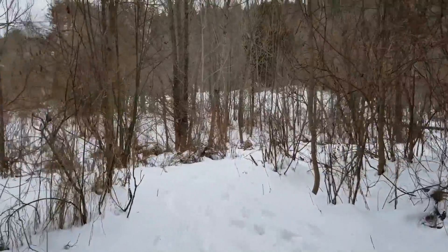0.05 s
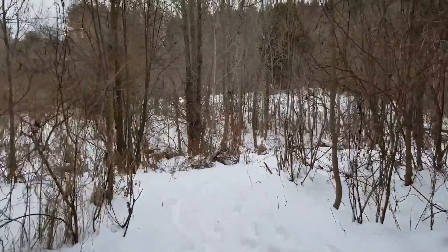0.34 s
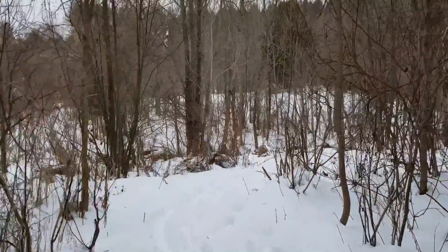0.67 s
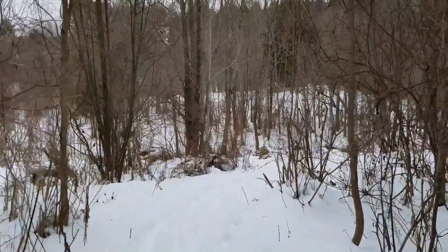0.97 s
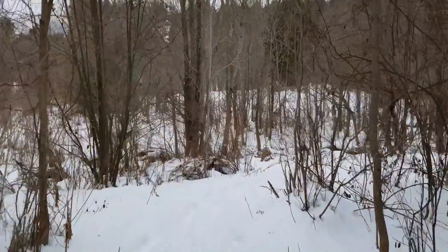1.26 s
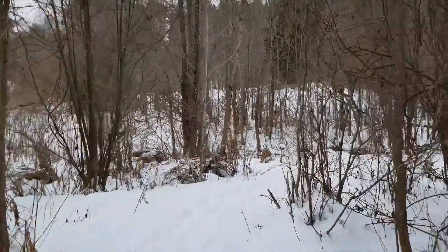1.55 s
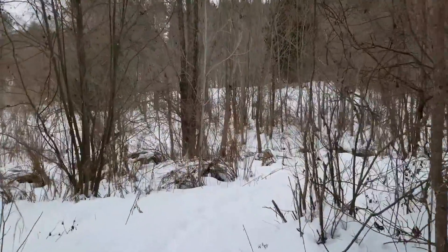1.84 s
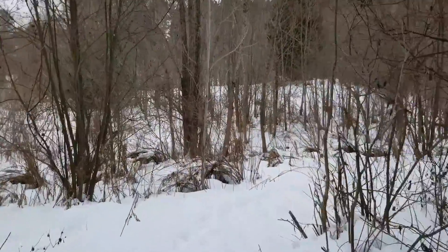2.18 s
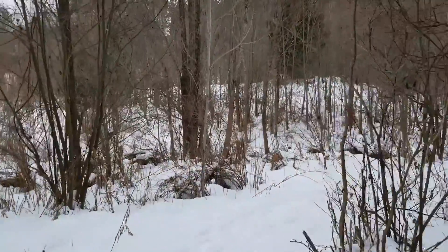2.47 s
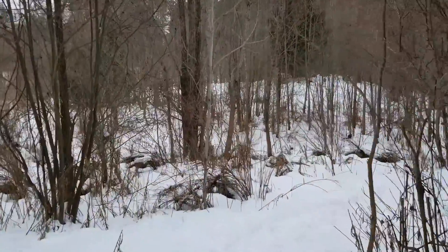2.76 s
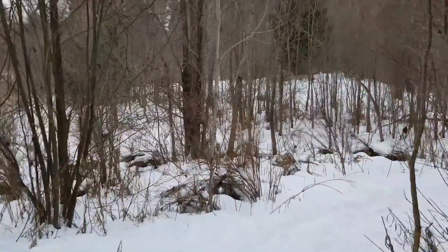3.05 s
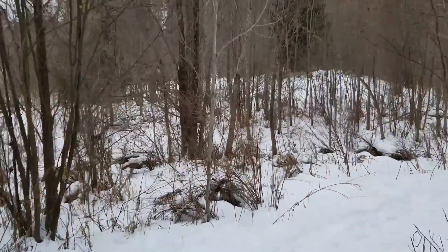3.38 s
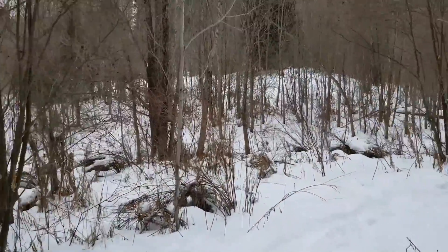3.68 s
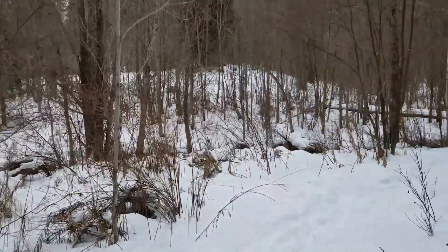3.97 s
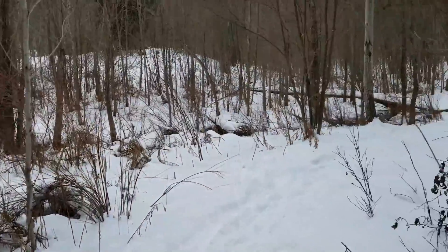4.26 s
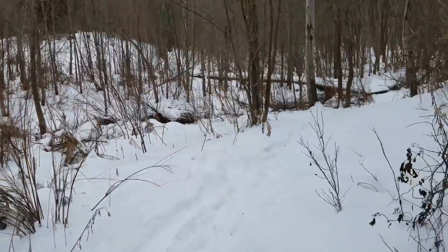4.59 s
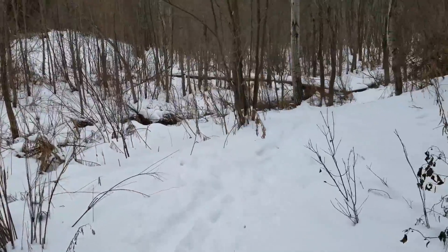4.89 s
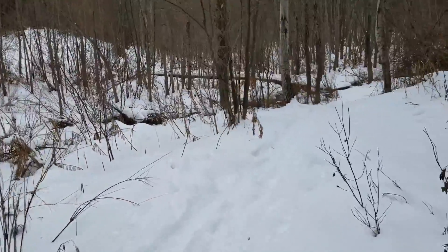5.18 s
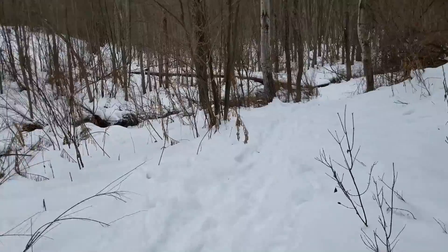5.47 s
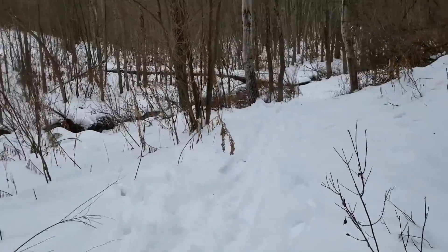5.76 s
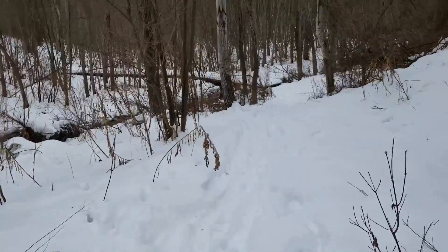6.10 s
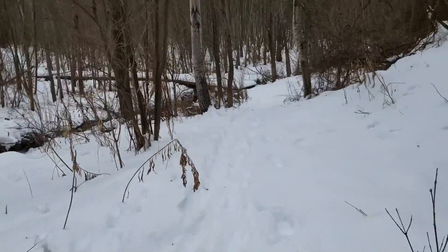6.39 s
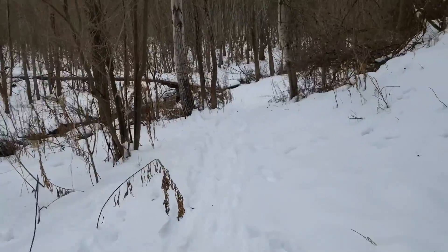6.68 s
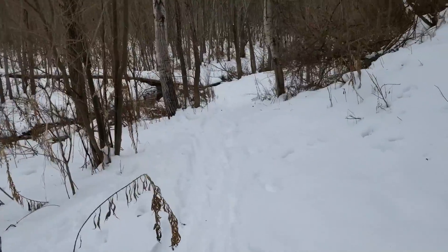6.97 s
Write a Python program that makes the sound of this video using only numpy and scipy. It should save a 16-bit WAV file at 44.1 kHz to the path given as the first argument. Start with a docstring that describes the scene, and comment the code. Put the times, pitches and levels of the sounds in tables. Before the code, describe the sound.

Steady footsteps crunch through old, crusty snow, about two a second, close and dry over a faint hiss.

```python
"""Footsteps in old snow in a quiet wood, two a second, dry and close over a faint, even hiss.
Each boot first scuffs the surface, then the heel bites. As the weight comes on, ice bonds snap by the
thousand, crystals fizz and the pack groans; bits of crust give way in hollow crunches and the sole drops
with dull thuds. The boot lifts and loose snow trickles back. From about 2 s on a few small things snap,
and around 4 s come the hardest crunch and thud."""
import sys
import numpy as np
from scipy import signal
from scipy.fft import rfft, irfft, next_fast_len
from scipy.io import wavfile
from scipy.ndimage import uniform_filter1d, map_coordinates

SR = 44100
rng = np.random.default_rng(int(sys.argv[2]) if len(sys.argv) > 2 else 0)


def bounce(signal):
    """Save signal as a 16-bit WAV file at the path given by the first command-line argument."""
    frames = np.transpose(np.atleast_2d(signal))
    limited = np.clip(frames, -1, 1)
    pcm = np.round(limited * 32767).astype(np.int16)
    wavfile.write(sys.argv[1], SR, pcm)


N = 310464


def snow():
    """The main layer: low groan, mid crunch and top fizz, ridden by the boots and surging together."""
    pack_db, crunch_db, fizz_db = tread()
    breaks, shake_power, fizz_power = crust_breaks(crust_grains(), creak_q=2.2, creak_share=0.33)
    surge = avalanches(per_s=72, fade_s=0.0073)
    crust = unit(crust_grains() * amp(0.9 * surge + 0.87 * wobble(per_s=140)))
    low = amp(1.06) * pack_groan(surge) * np.sqrt(amp(pack_db) ** 2 + amp(-8) ** 2 * shake_power)
    mid = amp(-0.5) * (crust * amp(crunch_db) + breaks)
    top = amp(1.5) * crystal_fizz(surge) * np.sqrt(amp(fizz_db) ** 2 + fizz_power)
    return low + mid + top + amp(-13) * crackle() * amp(crunch_db)


# Footsteps: landing t/s, press to full weight t/s, roll to lift-off t/s, full-weight crunch level/dB,
# swell from landing/dB, sag to lift-off/dB, pack over crunch/dB, fizz over crunch/dB,
# scuff level/dB, scuff length/s, trickle level/dB
STEPS = [(0.172, 0.043, .17, -30, -1, 15.5, -11, -2.5, -45.5, .109, -51),
         (0.554, 0.15, 0.096, -29.5, 17, 4, -12, 0.5, -47, 0.043, -39.5),
         (1.069, 0.092, 0.12, -29.5, 9.5, 7, -12, -3, -61, .048, -47.5),
         (1.563, .19, 0.092, -30, 10, 6.5, -11, -4.5, -44.5, .12, -43.5),
         (2.035, .15, 0.035, -28, 10, 1, -8.5, -3.5, -46.5, 0.099, -42.5),
         (2.531, 0.024, .14, -27.5, 11, 3.5, -12, -5.5, -42, 0.16, -37.5),
         (2.977, .21, 0.045, -26.5, 15, 7, -15, -3, -48.5, 0.047, -48),
         (3.452, 0.16, 0.029, -31, 9.5, -5, -15, -2.5, -72, .042, -33),
         (4.007, .14, 0.15, -26, 14, 17.5, -17, -3, -73, 0.023, -48.5),
         (4.489, .24, 0.059, -22.5, 15, 3, -18, -5.5, -71, .048, -43),
         (5.014, 0.16, .071, -22, 16, 15, -17.5, -3.5, -46.5, 0.079, -52.5),
         (5.476, 0.057, .17, -26.5, 3, 12.5, -17.5, -4, -44, .038, -50.5),
         (5.953, .13, 0.04, -26, 11, 5.5, -11, -2.5, -43, 0.092, -45),
         (6.408, 0.14, 0.062, -26, 9, 9.5, -11.5, -5.5, -41.5, 0.054, -47),
         (6.874, 0.069, 0.097, -29.5, 18, 0, -11.5, -1, -58.5, .039, -43)]
def tread():
    """Each boot grazes, lands, takes the weight and lifts: envelopes in dB for pack, crunch and fizz."""
    attack_s, release_s = 0.0025, 0.0022
    heel_db, heel_s = 1, 0.015
    scuff_rise_db_per_s, trickle_fall_db_per_s = 12, 95
    t = np.arange(N) / SR
    power = np.zeros((3, N))
    loose = amp(-52.5 + 2 * wobble(per_s=77)) ** 2  # crumbs keep stirring between the steps
    for land, press, roll, db, swell_db, sag_db, pack_db, fizz_db, scuff_db, scuff_s, trickle_db in STEPS:
        near = abs(t - land) < 1
        age, lift = t[near] - land, press + roll
        weight_db = np.interp(age, [0, press, lift], [-swell_db, 0, -sag_db])
        weight_db += heel_db * np.exp(-abs(age) / heel_s)  # the heel bites through the surface
        landed, lifted = gate(age, attack_s), gate(age - lift, release_s)
        # pack and fizz swell less than the crunch does
        layers_db = np.array([pack_db + 0.67 * weight_db, weight_db, fizz_db + 0.65 * weight_db])
        power[:, near] += (amp(db + layers_db) * landed * (1 - lifted)) ** 2
        grazing = gate(age + scuff_s, attack_s) * (1 - landed)
        scuff = amp(scuff_db - scuff_rise_db_per_s * abs(age)) * grazing
        trickle = amp(trickle_db - trickle_fall_db_per_s * abs(age - lift)) * lifted
        loose[near] += scuff ** 2 + trickle ** 2
    loose_balance = amp([[-10.5], [0], [-0.5]])  # loose snow has little low end
    return 10 * np.log10(power + loose * loose_balance ** 2)


# Tone of the breaking crust: f/Hz, level/dB
CRUST_EQ = [(100, -57.5), (280, -2.5), (480, -0.5), (900, 1), (1900, -0.5), (2800, -3), (4500, -8.5),
            (6500, -9.5), (12000, -35)]
def crust_grains():
    """The body of the crunch: dense, soft fractures of middling size."""
    fractures = grains(count=30000, low_hz=317, high_hz=5510, cycles=0.89, spread_db=0.5, samples=160)
    return squeaky(coloured(fractures, CRUST_EQ), patchy_db=2.5)


def crackle():
    """The edge on the crunch: single bonds snap clear of the rest."""
    bonds = grains(count=2500, low_hz=910, high_hz=4970, cycles=0.67, spread_db=14.5, samples=120)
    return unit(coloured(bonds, CRUST_EQ))


# Bits of crust giving way: centre t/s, length/s, crunch level/dB, fizz level/dB, creak f/Hz
CRUST_BREAKS = [(0.113, 0.021, -30.5, -38.5, 960), (0.365, 0.019, -33, -40, 1520),
                (0.431, 0.011, -35.5, -37.5, 1700), (0.487, .018, -40.5, -49, 990),
                (0.719, 0.025, -24.5, -36, 870), (0.752, .016, -20.5, -39, 2110),
                (0.871, .011, -37, -36, 800), (0.969, 0.035, -40.5, -47, 820),
                (1.171, 0.019, -25, -47, 1790), (1.573, 0.023, -39, -34, 910),
                (1.633, 0.017, -28.5, -34.5, 840), (1.726, 0.033, -22, -31, 700),
                (1.802, 0.017, -29, -42, 1100), (2.036, 0.012, -24, -41, 1120),
                (2.184, 0.013, -30, -35, 1400), (2.262, 0.011, -33.5, -34, 690),
                (2.483, 0.014, -37, -41, 1180), (2.666, 0.015, -20.5, -34, 680),
                (2.888, 0.023, -42, -42.5, 700), (2.92, 0.014, -35.5, -39, 1000),
                (3.276, .012, -32.5, -41, 1090), (3.459, 0.013, -38.5, -39, 885),
                (3.584, .015, -28, -30.5, 1000), (3.658, .016, -15, -27, 2110),
                (3.888, 0.028, -35, -40, 1790), (3.96, 0.0078, -38.5, -44, 924),
                (4.022, 0.026, -46, -32, 1200), (4.09, 0.03, -26.5, -40, 770),
                (4.153, .018, -20.5, -31, 700), (4.393, 0.031, -41.5, -46, 1080),
                (4.502, 0.014, -25.5, -35, 740), (4.722, 0.015, -28, -28, 1280),
                (4.917, 0.018, -28, -41, 1170), (4.984, 0.0092, -38.5, -36.5, 1107),
                (5.025, 0.015, -32.5, -36, 1740), (5.155, 0.01, -25, -24.5, 700),
                (5.379, 0.02, -38, -45, 930), (5.86, 0.023, -44.5, -57, 1000), (5.91, 0.016, -33, -54, 890),
                (5.956, 0.014, -28, -38, 1030), (6.084, 0.022, -29, -48, 645),
                (6.285, .025, -46, -50, 1200), (6.367, 0.013, -40, -53, 1100),
                (6.414, .013, -31, -46, 1100), (6.638, 0.015, -42, -44, 1790),
                (6.673, 0.012, -38.5, -38, 695), (6.714, 0.016, -42, -46, 1680),
                (6.766, .014, -34, -39, 910), (6.836, 0.0089, -40.5, -51, 700),
                (6.889, 0.037, -45, -33.5, 1200), (6.934, 0.014, -27.5, -28, 1080)]
def crust_breaks(crust, creak_q, creak_share):
    """Slabs break fast and settle: returns the crunches and the power they send to pack and fizz."""
    t = np.arange(N) / SR
    crunches, shake_power, fizz_power = np.zeros((3, N))
    for centre, length, crunch_db, fizz_db, hz in CRUST_BREAKS:
        near = slice(max(0, int((centre - .1) * SR)), int((centre + .1) * SR))
        offset = (t[near] - centre) / length
        attack = 1 / (1 + np.exp(np.clip(-14 * (offset + .5), -50, 50)))
        swell = attack * np.exp(-1.5 * offset ** 2)
        # the slab rings briefly at a pitch set by its size
        creak = unit(signal.lfilter(*signal.iirpeak(hz, creak_q, SR), crust[near]))
        envelope = amp(crunch_db) * swell
        crunches[near] += envelope * unit(creak_share * creak + (1 - creak_share) * crust[near])
        shake_power[near] += (envelope * 700 / hz) ** 2  # big, low slabs shake the pack most
        fizz_power[near] += (amp(fizz_db) * swell) ** 2
    return crunches, shake_power, fizz_power


# Tone of the snow pack: f/Hz, level/dB
PACK_EQ = [(30, -60), (60, -34), (100, -14), (160, -1.5), (260, 2), (400, 0.5), (550, 0), (1000, -50),
           (3000, -61)]
def pack_groan(surge):
    """The weight under the step: coarse, low fractures as the snow packs down."""
    fractures = grains(count=3200, low_hz=105.5, high_hz=700, cycles=1.0, spread_db=15.5, samples=900)
    return unit(coloured(fractures * amp(0.95 * surge), PACK_EQ))


# Tone of the snow's top fizz, with the microphone's peaks near 9.3 and 15 kHz: f/Hz, level/dB
FIZZ_EQ = [(1500, -53.5), (3500, -9.5), (5500, -10), (8300, -2.5), (9150, .5), (9700, 0), (10700, -9.5),
           (12200, -8), (14000, -2.5), (15800, -1)]
def crystal_fizz(surge):
    """The sparkle on top: the finest fractures, with extra avalanches of their own."""
    fractures = grains(count=60000, low_hz=3040, high_hz=17700, cycles=0.53, spread_db=0, samples=24)
    flicker_db = 1.4 * surge + 1.3 * avalanches(per_s=150, fade_s=0.011)
    return squeaky(coloured(fractures * amp(flicker_db), FIZZ_EQ), patchy_db=1.9)


# Sudden drops of the sole: t/s, relative level/dB, nominal f/Hz
SOLE_DROPS = [(0.2007, -25, 312), (0.37, -30, 290), (0.7095, -21, 685), (0.7359, -15.5, 440),
              (0.771, -25, 350), (1.5068, -34.5, 340), (1.6284, -32, 513), (1.6948, -28, 556),
              (1.729, -18.5, 453), (1.936, -30, 284.6), (2.0162, -28.5, 360), (2.0547, -24.5, 308),
              (2.259, -25, 425), (2.488, -30.5, 276), (2.5559, -27, 647), (2.6779, -18.5, 493),
              (2.742, -22, 360), (2.8834, -31, 520), (3.7118, -19, 410), (3.7199, -16.5, 550),
              (4.0464, -22.5, 275), (4.1334, -13.5, 418), (4.6, -24, 500), (5.158, -15, 523),
              (6.0755, -19.5, 560), (6.9291, -23, 606)]
def sole_thuds():
    """The sole drops and stops: a heavily damped swing that dives in pitch, with a puff of grit."""
    out, t = np.zeros(N + SR), np.arange(SR // 20) / SR
    for start, db, hz in SOLE_DROPS:
        turns = hz * (0.733 * t + 0.000519 * (1 - np.exp(-t / 0.0009)))
        swing = np.sin(2 * np.pi * turns) * np.exp(-turns / 0.78)
        grit = 0.33 * rng.standard_normal(len(t)) * np.exp(-t / 0.0052)
        out[round(start * SR):][:len(t)] += amp(db + 5.5) * (swing + grit)
    thud_eq = [(30, -20), (60, -37), (130, -5.5), (250, 1.5), (1800, 7.5), (5000, -11), (15000, -17)]
    return coloured(out[:N], thud_eq)


# Small dry snaps of ice or twigs: t/s, relative level/dB
SNAPS = [(1.858, -29), (2.828, -25), (2.8396, -28), (3.2362, -23), (3.34, -27), (3.3577, -30),
         (6.1919, -27), (6.641, -34)]
def snaps():
    """Ice or a twig breaks: a tick of a millisecond or two with a thin, bright ring."""
    out, t = np.zeros(N + SR), np.arange(SR // 50) / SR
    for start, db in SNAPS:
        ring_hz = 2900 * np.exp(0.082 * rng.standard_normal())
        ring = 0.75 * np.sin(2 * np.pi * ring_hz * t)
        crack = 0.37 * rng.standard_normal(len(t))
        out[round(start * SR):][:len(t)] += amp(db + 3.5) * (ring + crack) * np.exp(-t / 0.00051)
    return out[:N]


# Tone of the background hiss, with the microphone's peaks near 9.3 and 15 kHz: f/Hz, level/dB
HISS_EQ = [(25, -36), (60, -19), (150, -1), (450, -2), (1500, -4), (5500, -12), (9300, -1), (11000, -12),
           (15800, -8)]
def hiss():
    """The bed: a faint, even background hiss."""
    return amp(-57) * unit(coloured(rng.standard_normal(N), HISS_EQ))


def grains(count, low_hz, high_hz, cycles, spread_db, samples):
    """A cloud of tiny fractures, rms 1: each rings for a cycle or so at its own pitch and strength."""
    when, pitch, strength, sign = rng.random((count, 4)).T
    hz = low_hz + (high_hz - low_hz) * pitch
    turns = hz[:, None] * np.arange(samples) / SR
    gain = np.sign(sign - .5) * np.sqrt(hz) * amp(spread_db * strength ** 2)  # many faint, few strong
    rings = gain[:, None] * np.sin(2 * np.pi * turns) * np.exp(-turns / cycles)
    where = (when * N).astype(int)[:, None] + np.arange(samples)
    return unit(np.bincount(where.ravel(), rings.ravel(), N)[:N])


def avalanches(per_s, fade_s):
    """A modulator, mean 0 and rms 1: one failure sets off many at once, then they die away."""
    triggers = (rng.random(N) < per_s / SR).astype(float)
    activity = signal.lfilter([1], [1, -np.exp(-1 / (fade_s * SR))], triggers)
    return unit(activity - activity.mean())


def squeaky(x, patchy_db):
    """Neighbouring grains lock for a few hundredths of a second, so brief pitches poke out; rms 1."""
    spectrum = signal.stft(x, nperseg=512)[2]
    patches = uniform_filter1d(rng.standard_normal(spectrum.shape), size=4, axis=0)  # across pitch
    patches = uniform_filter1d(patches, size=4, axis=1)  # across time
    return unit(signal.istft(spectrum * amp(patchy_db * unit(patches)), nperseg=512)[1][:N])


def coloured(x, eq):
    """Minimum-phase EQ through (f/Hz, level/dB) points, so attacks have no pre-ring."""
    size = 2 * next_fast_len(N // 2 + 4096)
    hz, db = np.transpose(eq)
    gain = amp(np.interp(np.log(np.fft.rfftfreq(size, 1 / SR) + 1), np.log(hz), db))
    cepstrum = irfft(np.log(gain))
    cepstrum[1:size // 2] *= 2
    cepstrum[size // 2 + 1:] = 0
    return irfft(rfft(x, size) * np.exp(rfft(cepstrum)), size)[:N]


def wobble(per_s):
    """A smooth random modulator with per_s knots a second."""
    return map_coordinates(rng.standard_normal(N // 20), [np.arange(N) * per_s / SR], mode="wrap")


def gate(t, edge_s):
    """Opens smoothly as t passes zero."""
    return .5 + .5 * np.tanh(t / (2 * edge_s))


def amp(db):
    """Decibels to gain."""
    return 10 ** (np.asarray(db) / 20)


def unit(x):
    """Scaled to rms 1."""
    return x / np.sqrt(np.mean(x ** 2) + 1e-20)


def scene():
    """A dry mono mix: snow swallows every echo."""
    return (snow() + sole_thuds() + snaps() + hiss())[None]


def record(dry):
    """The hand-held camera's tone: a low cut on the deep bass and a brick wall on the top."""
    low_cut_hz, top_hz = 72, 15900
    sound = signal.sosfilt(signal.butter(2, low_cut_hz, "highpass", fs=SR, output="sos"), dry)
    size = next_fast_len(N + 8192)
    passband = np.fft.rfftfreq(size, 1 / SR) < top_hz
    return irfft(rfft(sound, size) * passband, size)[:, :N]


dry = scene()
out = record(dry)
bounce(out)
```